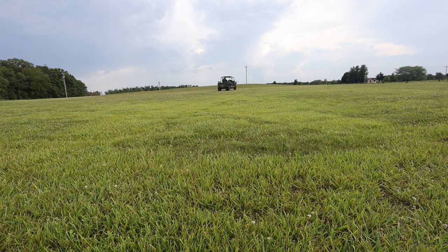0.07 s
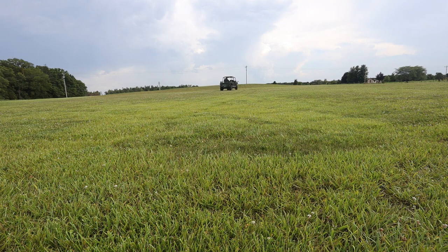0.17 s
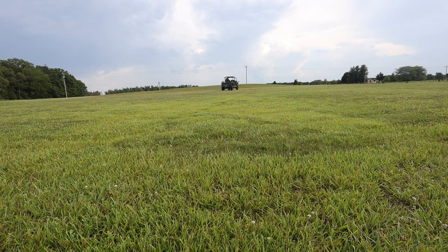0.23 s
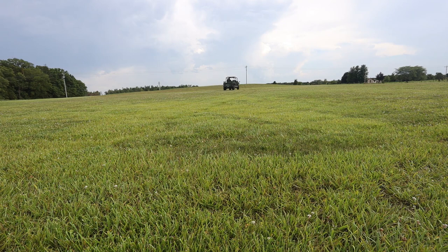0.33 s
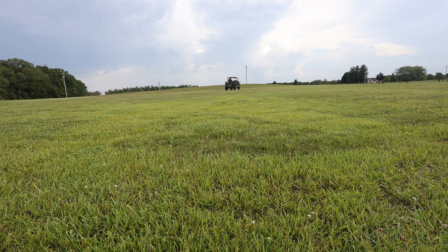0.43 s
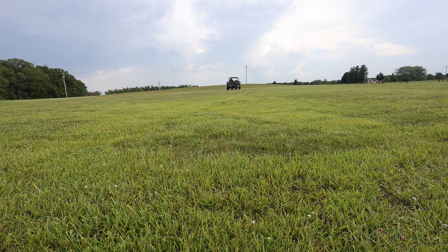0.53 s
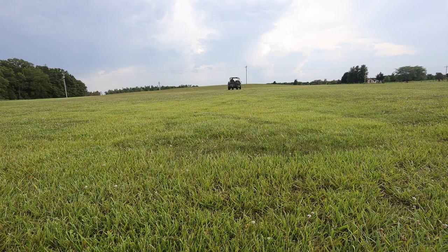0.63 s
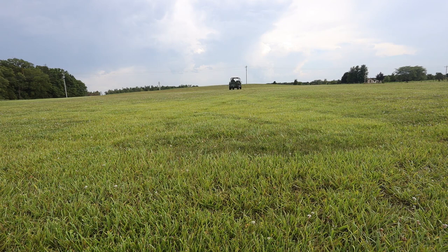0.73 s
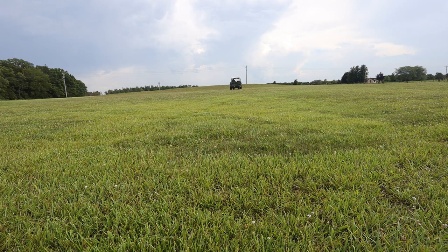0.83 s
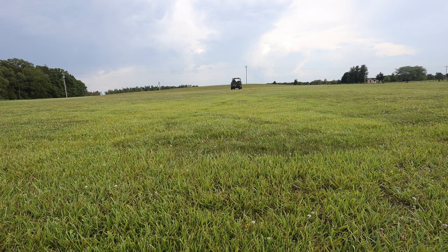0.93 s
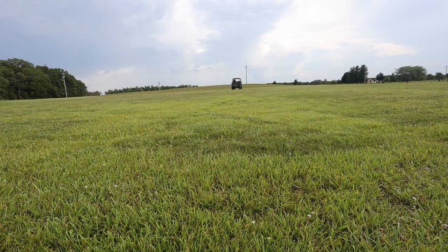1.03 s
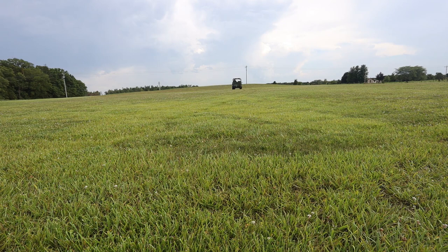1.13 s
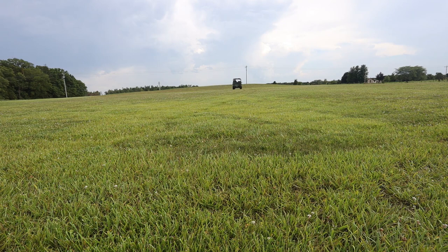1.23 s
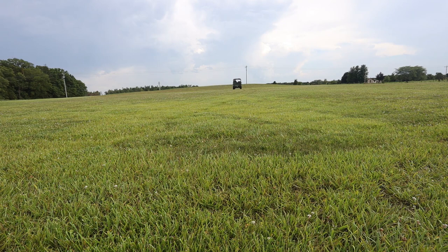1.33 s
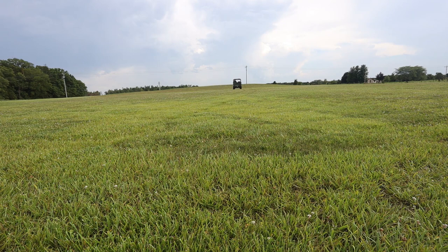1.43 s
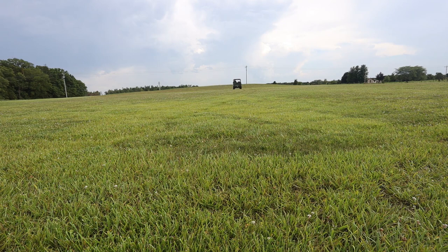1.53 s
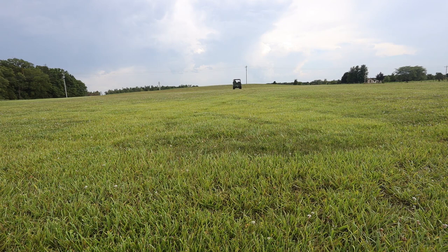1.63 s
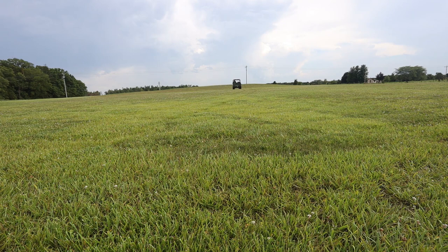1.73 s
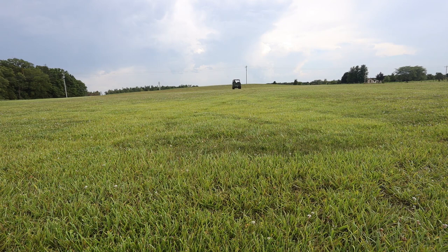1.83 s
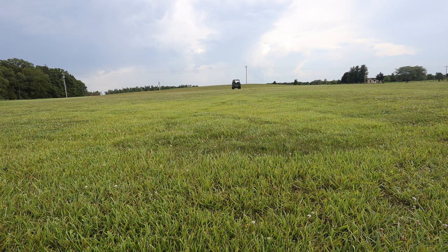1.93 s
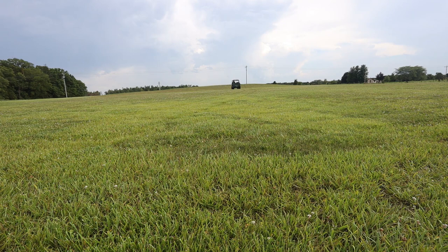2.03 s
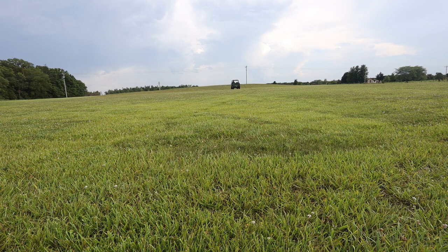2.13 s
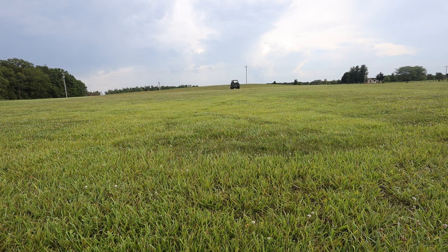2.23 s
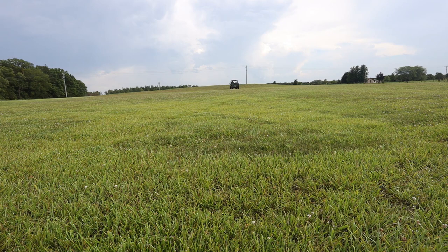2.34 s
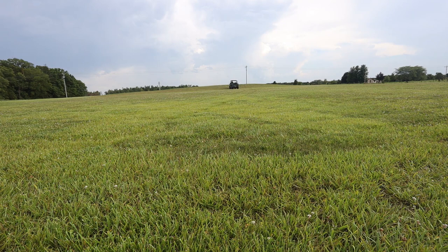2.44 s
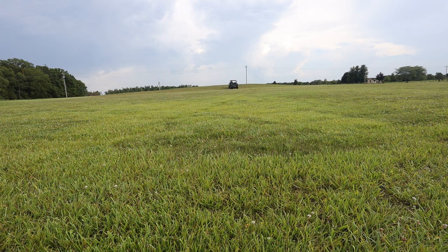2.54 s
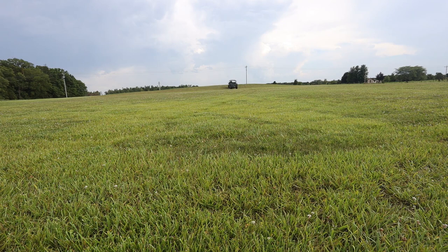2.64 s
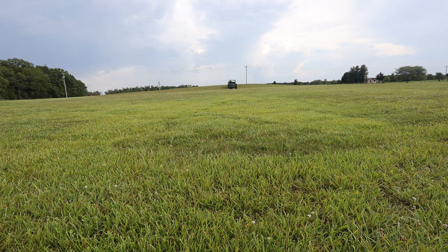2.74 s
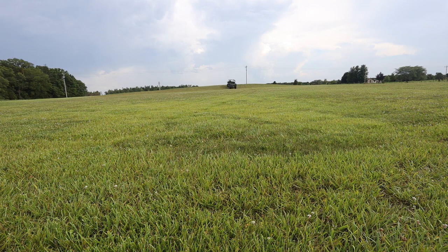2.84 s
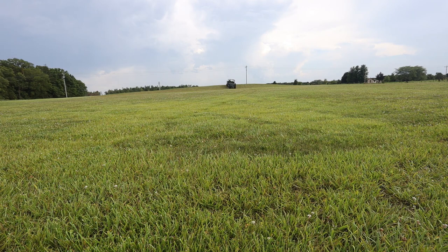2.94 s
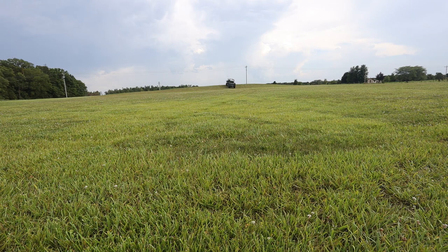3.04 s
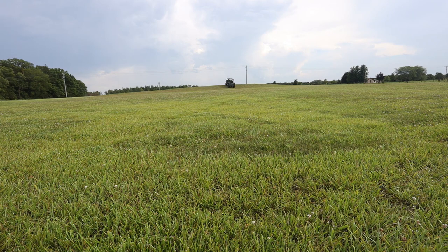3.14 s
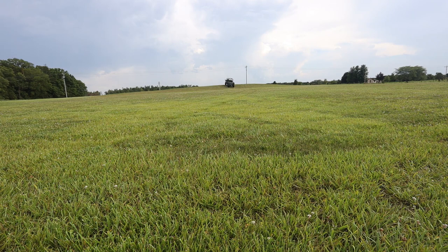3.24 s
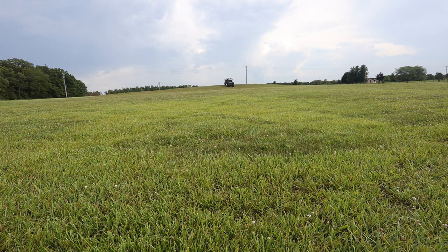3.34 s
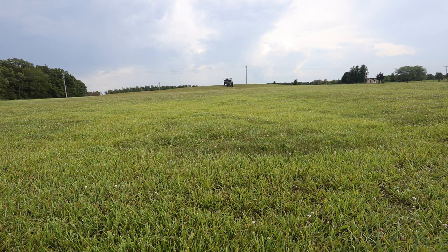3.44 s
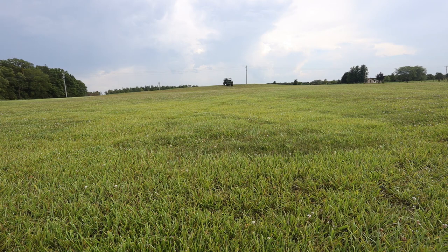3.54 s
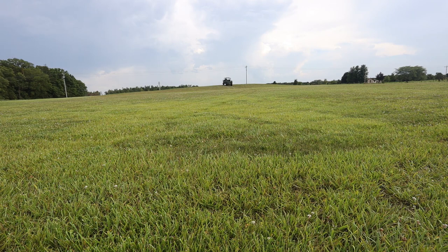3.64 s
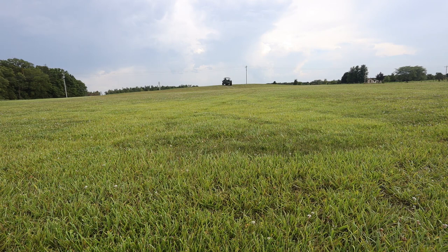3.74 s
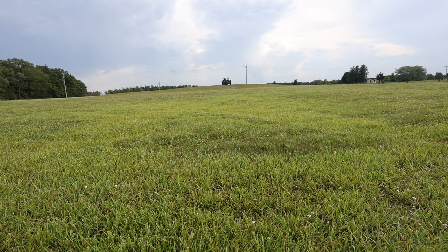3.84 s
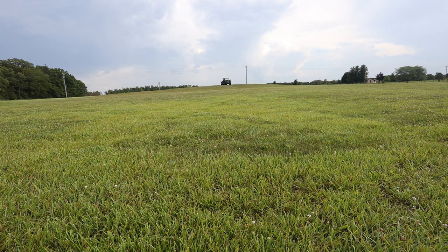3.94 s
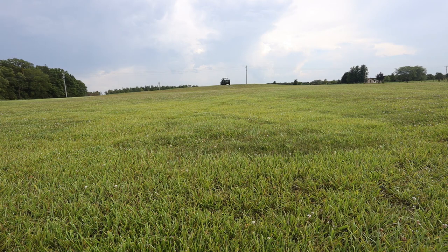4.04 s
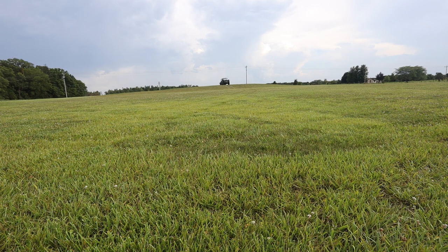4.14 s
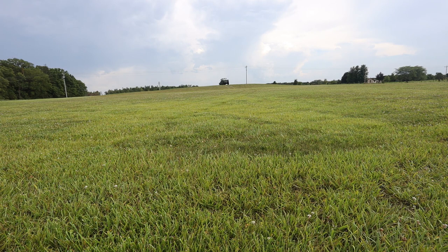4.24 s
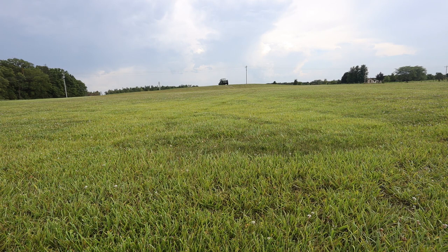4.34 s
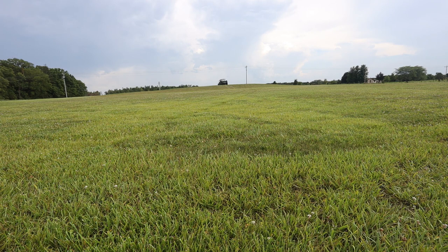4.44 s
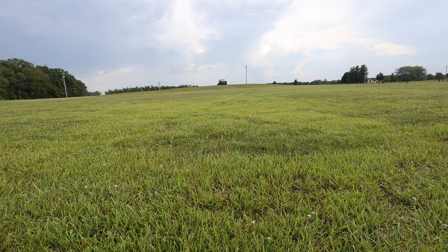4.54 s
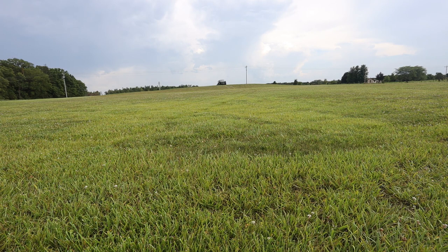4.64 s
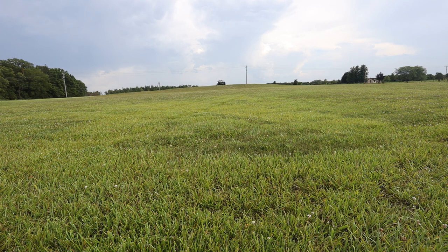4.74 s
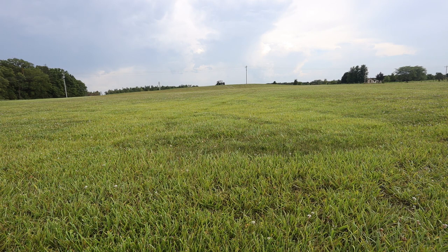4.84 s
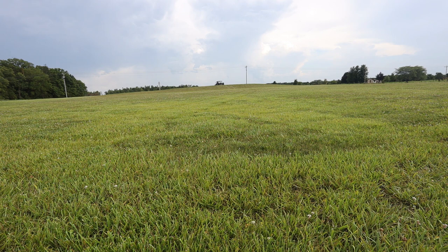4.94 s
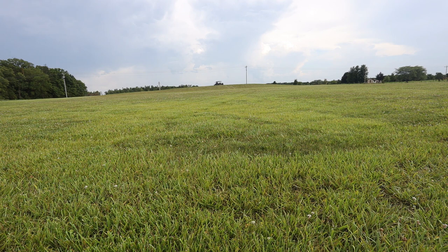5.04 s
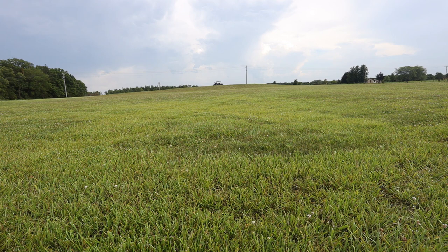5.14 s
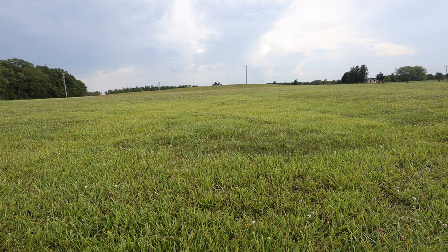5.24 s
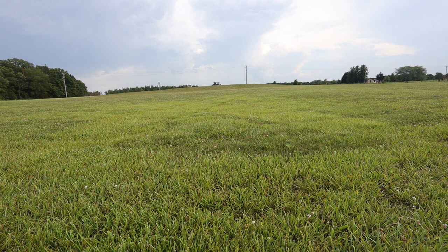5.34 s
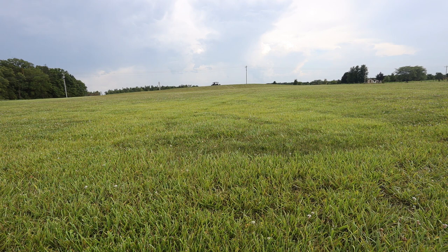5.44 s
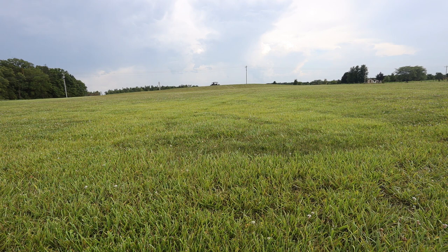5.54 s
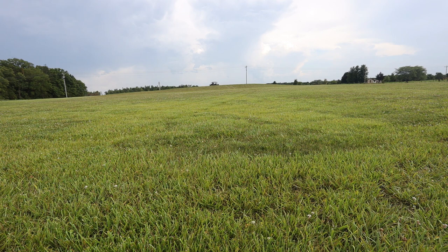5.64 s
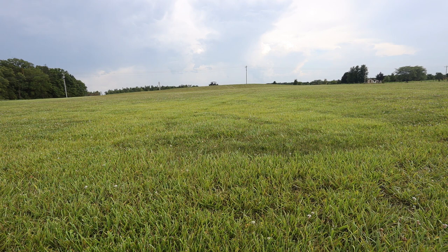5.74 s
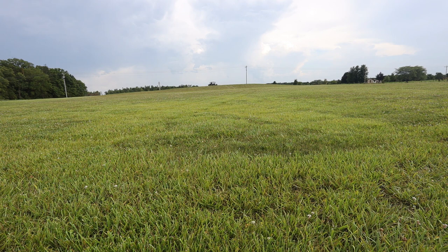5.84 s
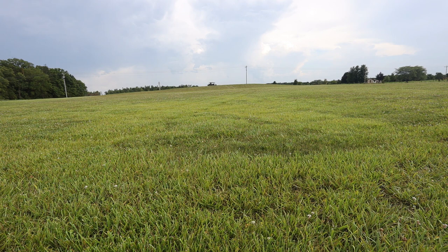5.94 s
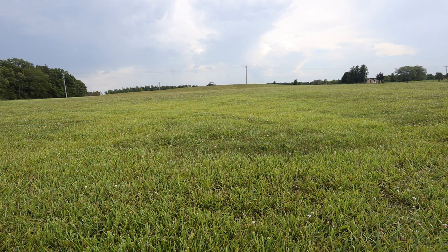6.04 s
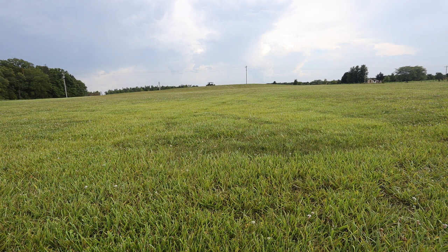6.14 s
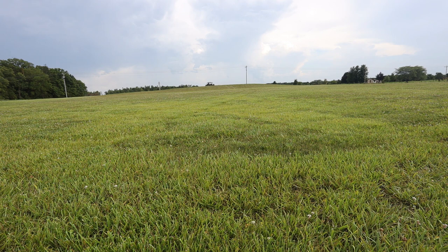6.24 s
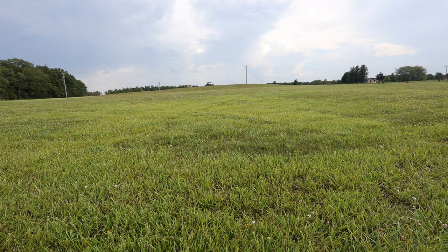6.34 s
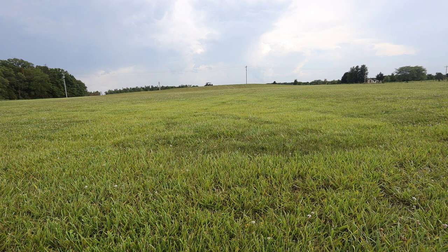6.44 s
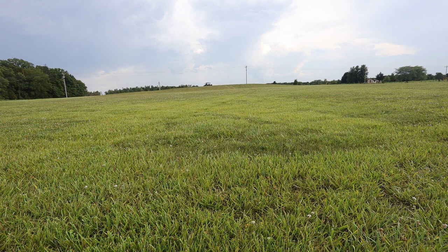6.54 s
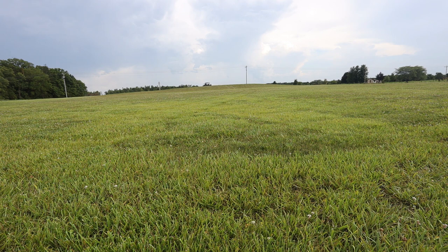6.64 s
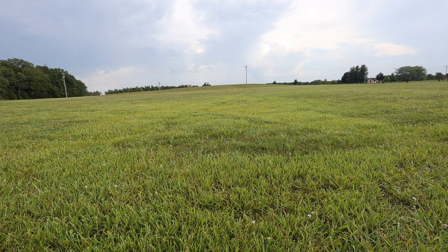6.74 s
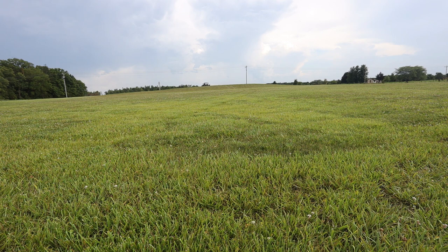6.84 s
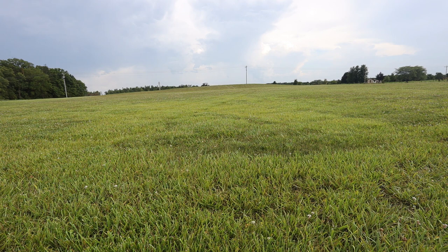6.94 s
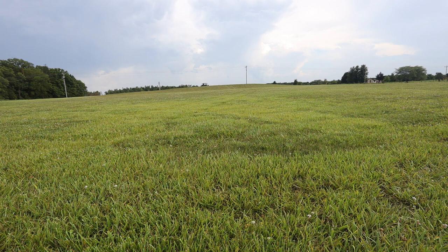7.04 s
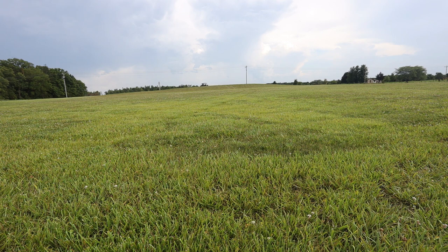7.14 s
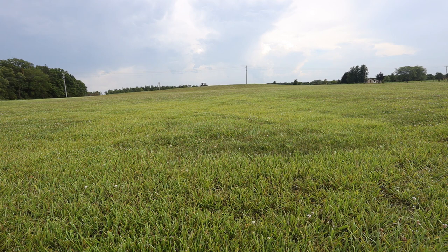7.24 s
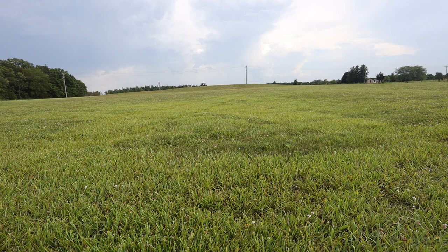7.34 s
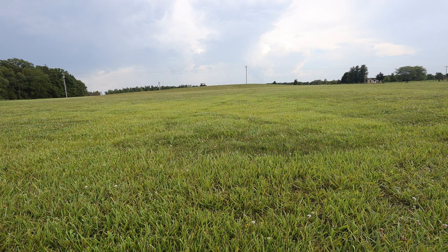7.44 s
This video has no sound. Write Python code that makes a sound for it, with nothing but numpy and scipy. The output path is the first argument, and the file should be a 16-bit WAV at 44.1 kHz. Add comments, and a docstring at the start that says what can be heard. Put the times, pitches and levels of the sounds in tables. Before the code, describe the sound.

Distant rough engine with low exhaust tones and bright clatter slows to a lumpy mutter, then revs higher, rattling over bumps as it recedes.

```python
"""Clean low exhaust tones over a rough roar: a heavy four-cylinder off-road vehicle, far across a grass field.
It slows, revs up and drops behind a rise. The tones are sine waves tied to the engine's firings.
The roar and the clatter of the engine block are noise that pulses with the firings.
Loose bodywork clanks over bumps as bursts of ringing noise, a spring squeaks and the chassis thumps once.
A thin intake whistle falls in pitch at the start, a few soft hums come and go, and the microphone hisses."""
import sys
import numpy as np
from scipy import signal
from scipy.fft import rfft, irfft
from scipy.io import wavfile
from scipy.ndimage import uniform_filter1d

SR = 44100
rng = np.random.default_rng(int(sys.argv[2]) if len(sys.argv) > 2 else 0)


def persist_wave(psi):
    """Save psi, clipped to +-1, as 16-bit WAV."""
    counts = np.round(np.clip(psi, -1, 1) * 32767).astype(np.int16)
    wavfile.write(sys.argv[1], SR, np.atleast_2d(counts).T)


def gain_from_db(level_db):
    """Turn a decibel level (scalar or array-like) into a linear amplitude factor."""
    decades = np.asarray(level_db, float) / 20
    return 10 ** decades


N = 329868
TIME = np.arange(N) / SR  # seconds

# colour of the microphone hiss: pitch_hz, density_db (per Hz)
HISS_COLOUR = [(500, 11.5), (4000, -0.5), (9000, -4.5), (12000, -6.5), (16000, -6.5)]
# thin high whistle from the intake: time_s, pitch_hz, level_db
WHISTLE = [(0, 12700, -71), (.35, 12400, -71), (.55, 12150, -77), (.75, 12050, -71), (1, 11700, -72),
           (1.4, 11100, -77), (1.8, 10800, -92)]
# soft hums that glide in pitch: start_s, end_s, start_pitch_hz, end_pitch_hz, level_db
HUMS = [(0, 1, 236, 228, -36), (0, .4, 598, 594, -43), (.9, 1.7, 540, 524, -43), (.3, .8, 640, 632, -48),
        (3.1, 3.5, 400, 370, -48)]
# chassis landing: strength_db, low_mode_hz, upper_mode_hz, time_to_fade_60_db_s
THUMP = (-20, 172, 270.5, 0.12)
# short spring squeaks: start_s, length_s, pitch_hz, level_db (of the lowest tone)
SQUEAKS = [(5.42, .045, 1850, -44), (5.503, .015, 1950, -49), (6.19, .02, 1950, -50),
           (7.16, .07, 7300, -58)]
# bodywork clanks: start_s, peak_db (1 dB is added), centre_hz,
# treble_db (above 5 kHz, against the body; 4 dB is added), rattle_s (before it fades)
CLANKS = [(3.172, -36, 1560, -18.5, 0.011), (3.317, -31.5, 1340, -19, 0.0091),
          (3.417, -26.5, 2580, -34, 0.011), (3.44, -28.5, 1570, -33, 0.014),
          (4.1926, -32.5, 1270, -20, 0.013), (4.321, -34, 1520, -24, 0.0082),
          (4.4712, -24, 1672, -31, 0.0084), (4.5039, -35, 1280, -27, 0.011),
          (4.6186, -18.5, 3353, -30, 0.012), (4.6382, -26, 1500, -23, 0.013),
          (4.8737, -36, 1265, -16, 0.012), (4.8884, -27.5, 1319, -30, 0.0098),
          (4.8954, -31, 1310, -33, 0.01), (4.9703, -34, 2960, -22, 0.009),
          (5.3166, -33.5, 3100, -19, 0.012), (5.7356, -35.5, 1335, -26, 0.0095),
          (6.1393, -37, 1240, -23, 0.011), (6.1667, -33, 2590, -25, 0.012),
          (6.5744, -34.5, 1720, -14, 0.0097), (6.6608, -29.5, 2975, -24, 0.012),
          (6.6812, -25, 1411, -22, 0.018), (6.6978, -26.5, 2860, -22, 0.011),
          (6.732, -31, 1770, -21, 0.0089), (6.7785, -29.5, 2573, -23, 0.02),
          (6.8384, -32.5, 2876, -22, 0.0096), (6.909, -38, 3768, -20, 0.0085),
          (6.925, -37.5, 1830, -23, 0.008), (7.1761, -32.5, 3366, -25, 0.012),
          (7.1958, -24, 1740, -22.5, 0.016), (7.224, -30, 1640, -25, 0.011),
          (7.3104, -26.5, 2870, -15.5, 0.0074), (7.4525, -32, 1239, -22, 0.011)]
# resonances of the loose panel: pitch_hz, width_hz, strength_db
PANEL = [(1240, 60, 10), (1720, 420, 20.5), (2460, 360, 14), (2870, 30, 13), (3380, 60, 15), (4120, 40, 5)]
# level of the block clatter: time_s, level_db
CLATTER_LEVEL = [(0.0, -30.5), (0.98, -30), (1.79, -35.5), (2.02, -38), (2.46, -42.5), (2.88, -43),
                 (3.58, -39), (4.5, -40.5), (4.87, -44.5), (5.81, -45.5), (6.1, -43.5), (6.73, -45),
                 (6.88, -51), (7.25, -44), (7.48, -53.5)]
# colour of the clatter with the engine fast, then slow: pitch_hz, density_db (per Hz)
CLATTER_FAST = [(410, -34), (700, -12), (888, -16.5), (1170, -10), (1330, -10), (1450, -0.5), (1810, -2),
                (2020, -7.5), (3240, -9), (4370, -8.5), (4860, -21), (5220, -20), (5950, -23),
                (8010, -15.5), (12000, -37.5), (15600, -64), (22000, -120)]
CLATTER_SLOW = [(410, -41), (700, -23), (1240, -3.5), (1360, -5), (1480, -5), (1830, -2), (1990, -6.5),
                (2330, -3.5), (2710, 1), (4210, -5.5), (4920, -15), (5350, -16), (5880, -27), (7920, -30),
                (12000, -38), (15600, -58), (22000, -120)]
# how the clatter follows engine speed: firings_hz (per second), throb_depth (0-1), slow_colour_share (0-1)
KNOCK = [(29.27, 0.98, 0.77), (38, 0.58, 0.4), (43, 0.71, .45), (50, 0.29, 0.4), (62, 0.55, 0.3)]
# ringing of the engine block: pitch_hz, width_hz, peak_db (gain at the centre, before it swells and fades)
BLOCK_RINGS = [(1436, 30, 4), (1864, 28, 0.5), (3500, 10, 3), (5180, 100, 6.5), (7360, 39, 4)]
# treble notch where the direct path and the ground path cancel: centre_hz, width_hz, depth (0-1)
GROUND_NOTCH = (4880, 300, .85)
# level of the exhaust roar (2.5 dB is taken off for the noise): time_s, level_db
ROAR_LEVEL = [(0, -30), (.5, -30.5), (1, -29), (1.5, -31), (2, -32.5), (2.45, -35), (2.85, -39), (3.2, -39),
              (3.6, -39), (4.1, -37), (4.7, -36.5), (5.2, -38), (5.6, -36), (6, -37), (6.4, -34),
              (6.7, -34), (7, -40), (7.48, -40)]
# colour of the roar in the open, then behind the rise: pitch_hz, density_db (per Hz)
ROAR_OPEN = [(15, -50), (40, -43), (70, -31), (110, -14.5), (170, -18), (250, -23.5), (350, -25),
             (450, -28), (560, -29.5), (660, -32.5), (760, -43.5), (900, -59), (1200, -72), (2000, -120)]
ROAR_HIDDEN = [(15, -51), (40, -32), (70, -16), (110, -13.5), (170, -8.5), (230, -12.5), (300, -20.5),
               (400, -22.5), (470, -30.5), (540, -41.5), (700, -52.5), (900, -50), (1200, -43),
               (2000, -120)]
# how far the rise hides the vehicle: time_s, hidden_share (0-1)
HIDDEN = [(0, 0), (.7, 0.15), (2.2, 0.21), (2.7, 0.46), (3.8, 0.55), (4.2, 0.96), (7.48, 0.89)]
# engine speed and low exhaust tones: time_s, firings_hz (per second), level_db (0.8 dB is taken off)
ENGINE = [(0.0, 50.44, -21), (0.04, 49.52, -17), (0.96, 47.85, -16), (1.1, 46.8, -18), (1.58, 46.37, -20),
          (1.89, 45.73, -19.5), (2.39, 43.82, -21), (2.56, 39.45, -24.5), (3.02, 37.8, -26),
          (3.46, 31.44, -30), (3.9, 28.74, -29), (4.04, 30.45, -22.5), (4.29, 39.3, -19.5),
          (4.48, 46.4, -20.5), (4.62, 51.73, -22.5), (4.69, 53.25, -21.5), (5.25, 61.07, -23.5),
          (5.54, 62.2, -25), (5.77, 57.43, -26.5), (6.23, 62.2, -26.5), (6.46, 56.17, -24.5),
          (6.6, 57.3, -23), (6.73, 57.22, -29.5), (6.88, 53.45, -25.5), (7.23, 50.04, -30.5),
          (7.48, 52.8, -32.5)]
# response of pipe and ground to the four main tones, in the open, then behind the rise: pitch_hz, gain_db
PIPE_OPEN = [(28, -12), (40, -18.5), (49, -14.5), (60, 1), (76, -4.5), (95, -5.5), (115, -1), (130, 1.5),
             (146, 0), (160, -4), (182, -10), (196, -23.5), (250, -20)]
PIPE_HIDDEN = [(28, -22), (42, -17), (52, -14), (61, -5.5), (80, 2.5), (100, -5.5), (113, -3), (122, -9),
               (140, -6.5), (165, 1.5), (186, -3), (210, -17.5), (245, -6)]
# time with the throttle closed: start_s, end_s
COAST = (2.45, 4.0)
# change of the four main tones with the throttle closed, before they share the level: one gain_db each
COAST_DB = (0.5, 0.1, -4, -0.2)
# tones between the main ones, from unequal cylinders: quarter_steps, level_db (against the two neighbours)
UNEVEN = [(1, -23), (2, -24), (3, -17)]
# tones above the fourth main one, against the roar: main_tones_db, quarter_steps_db
UPPER_DB = (-5.5, -14)


def evened(x):
    """Scales a sound to an average strength (rms) of 1."""
    return x / np.sqrt(np.mean(x ** 2) + 1e-20)


def columns(rows, at=TIME):
    """Reads every later column of a table, with straight lines between the values of its first column."""
    first, *rest = np.transpose(rows)
    return [np.interp(at, first, column) for column in rest]


def read(points, hz):
    """Reads a spectrum at the frequencies hz, with straight lines on a log scale."""
    f, value = np.transpose(points)
    return np.interp(np.log(hz + 1), np.log(f + 1), value)


def resonate(x, hz, width):
    """A resonance of gain 1: shifts the pitch hz down to zero, smooths, and shifts back."""
    turn = np.exp(2j * np.pi * np.cumsum(hz * np.ones(len(x))) / SR)
    r = np.exp(-np.pi * abs(width) / SR)
    return 2 * (turn * signal.lfilter([1 - r], [1, -r], x / turn)).real


def drift(seconds):
    """Slow random wandering of rms 1: noise smoothed twice."""
    size = max(round(seconds * SR), 1)
    return evened(uniform_filter1d(uniform_filter1d(rng.standard_normal(N), size), size))


def slow(size, count):
    """Slow random wandering made of count random points joined by lines."""
    return np.interp(np.linspace(0, count - 1, size), np.arange(count), rng.standard_normal(count))


def noise(first_db, second_db, share, band_hz, size, patchy_db):
    """Patchy noise whose colour blends two spectra; its power inside band_hz is evened in every frame."""
    frames = 4 * N // size + 5
    hz = np.fft.rfftfreq(size, 1 / SR)
    share = np.clip(np.interp(np.arange(frames) * size / 4 / SR, TIME, share), 0, 1)
    colour = gain_from_db(np.outer(read(first_db, hz), 1 - share) + np.outer(read(second_db, hz), share))
    colour /= np.linalg.norm(colour[(hz > band_hz[0]) & (hz < band_hz[1])], axis=0)
    a, b, patches = rng.standard_normal((frames, len(hz), 3)).T
    patches = evened(uniform_filter1d(uniform_filter1d(patches, size=8, axis=0), size=8, axis=1))
    spectrum = (a + 1j * b) * colour * gain_from_db(patchy_db * patches)
    sound = signal.istft(spectrum, nperseg=size, noverlap=3 * size // 4)[1][:N]
    return sound * np.sqrt(.75 / 4) * 2  # makes up for the overlap of the frames


def throb(turns, depth, decay, spread_db):
    """One puff per firing, sudden then fading, each of its own strength; mean power is about 1."""
    strength = gain_from_db(spread_db * rng.standard_normal(1000))[turns.astype(int)]
    puff = evened(uniform_filter1d(strength * np.exp(-(turns % 1) / decay), size=160))
    depth = np.clip(depth, 0, 1)
    return np.sqrt(1 - depth + depth * puff ** 2)


def microphone_hiss():
    """Steady microphone hiss: coloured noise above 300 Hz."""
    hz = np.fft.rfftfreq(N, 1 / SR)
    hiss = irfft(rfft(rng.standard_normal(N)) * gain_from_db(read(HISS_COLOUR, hz)) * (hz > 300), N)
    return gain_from_db(-53.5) * evened(hiss)


def whistle():
    """Intake whistle: noise through two narrow resonances that fall in pitch."""
    hz, db = columns(WHISTLE)
    tone = resonate(resonate(rng.standard_normal(N), hz, 130), hz, 130)
    return gain_from_db(db) * evened(tone) * (TIME < WHISTLE[-1][0])


def hums():
    """Soft-edged gliding sines with a slightly unsteady phase."""
    out = np.zeros(N)
    for start, end, start_hz, end_hz, db in HUMS:
        hz = np.interp(TIME, (start, end), (start_hz, end_hz))
        phase = 2 * np.pi * np.cumsum(hz) / SR + .2 * drift(.08)
        # each hum fades in a little ahead of its start
        swell = np.clip(np.minimum(TIME - start + 0.287, end - TIME) / 0.05, 0, 1)
        out += gain_from_db(db) * swell * np.sqrt(2) * np.sin(phase)
    return out


def thump():
    """The chassis lands: two low modes struck once, the upper one twice as strong."""
    db, low_hz, upper_hz, fade_s = THUMP
    t = np.maximum(TIME - 7.198, 0)  # seconds since the landing
    modes = np.sin(2 * np.pi * low_hz * t) + 2.0 * np.sin(2 * np.pi * upper_hz * t)
    return gain_from_db(db - 60 * t / fade_s) * np.minimum(t / 0.0066, 1) * modes


def squeaks():
    """Stick-slip in a spring: three slightly rough harmonics, or one tone alone when the pitch is high."""
    out = np.zeros(N)
    for start, length, hz, db in SQUEAKS:
        t = TIME - start
        phase = 2 * np.pi * hz * t * (1 - .15 * t) + .25 * drift(.003)  # the pitch sags a little
        swell = np.cos(np.pi * np.clip(t / length - .5, -.5, .5))
        harmonics = range(3 if hz < SR / 8 else 1)
        tones = sum(gain_from_db(-4.5 * k ** 2 + 4 * k) * np.sin((k + 1) * phase) for k in harmonics)
        out += gain_from_db(db) * swell * tones
    return out


def clanks():
    """Each bump shakes a loose panel: a brief rattle of noise that rings its resonances."""
    out = np.zeros(N)
    t = TIME[:SR // 4]
    middle = signal.butter(7, (1000, 4600), "band", fs=SR, output="sos")
    high = signal.butter(4, (5000, 9500), "band", fs=SR, output="sos")
    shakes = rng.standard_normal((len(CLANKS), len(t)))
    for (start, db, centre_hz, treble_db, rattle_s), shake in zip(CLANKS, shakes):
        ticks = np.repeat(shake[::90], 90)[:len(t)]
        shake = shake * gain_from_db(2.0 * np.roll(ticks, shift=len(t) // 2))  # a bunch of uneven ticks
        shake = shake * (1 + .9 * np.exp(-t / .003))  # the first contact snaps
        fade_s = max(0.12 - 0.0051 * (db + 34), .02)  # time to fade 60 dB: louder clanks die sooner
        shake = shake * np.minimum(t / 0.00077, 1) * gain_from_db(-60 * np.maximum(t - rattle_s, 0) / fade_s)
        ring = np.zeros(len(t))
        for hz, width, strength_db in PANEL:
            # modes are weaker by 25 dB per octave away from the centre of the clank
            mode_db = strength_db - 25 * abs(np.log2(hz / centre_hz))
            ring += gain_from_db(mode_db) * resonate(shake, hz, width) / np.sqrt(width)
        centre = resonate(resonate(shake, centre_hz, 2200), centre_hz, 2600)
        body = signal.sosfilt(middle, .8 * evened(ring) + evened(centre))
        sound = evened(body) + gain_from_db(treble_db + 4.0) * evened(signal.sosfilt(high, shake))
        part = out[round(start * SR):][:len(t)]
        part += (gain_from_db(db + 1.0) * sound / abs(sound).max())[:len(part)]
    return out


def clatter(rate_hz, turns):
    """Combustion knock and valve gear: bright noise pulsing with the firings, ringing the block."""
    depth, slow_share = columns(KNOCK, rate_hz)
    air = noise(CLATTER_FAST, CLATTER_SLOW, slow_share, (1000, 4500), size=512, patchy_db=1.0)
    knock = air * throb(turns + 0.25, depth, decay=0.73, spread_db=0.97)
    for hz, width, db in BLOCK_RINGS:  # each ring swells and fades by itself
        swell = gain_from_db(1.54 * slow(N, count=30))
        knock = knock + (gain_from_db(db) - 1) * swell * resonate(knock, hz, width)
    return gain_from_db(columns(CLATTER_LEVEL)[0] + 0.26 * drift(0.025)) * knock


def roar(turns, hidden):
    """Turbulent exhaust and tyre rumble: low noise swelling a little with each firing."""
    air = noise(ROAR_OPEN, ROAR_HIDDEN, hidden, (260, 700), size=2048, patchy_db=2.0)
    return gain_from_db(columns(ROAR_LEVEL)[0] - 2.5) * air * throb(turns, 0.14, decay=0.99, spread_db=3.5)


def main_tones_db(rate_hz, level_db, hidden):
    """The pipe shares the exhaust level among tones 1 to 4; a closed throttle shifts the balance."""
    t = np.linspace(0, N / SR, len(hidden))
    coast = np.clip(np.minimum(t - COAST[0], COAST[1] - t) / .1, 0, 1)  # edges of 0.1 s
    pipe = []
    for k in (1, 2, 3, 4):
        hz = k * rate_hz
        gain_db = (1 - hidden) * read(PIPE_OPEN, hz) + hidden * read(PIPE_HIDDEN, hz)
        waver_db = 1.0 * slow(len(hidden), count=50)
        pipe.append(gain_db + coast * COAST_DB[k - 1] + waver_db)
    pipe = np.array(pipe)
    return level_db + pipe - 10 * np.log10((gain_from_db(pipe) ** 2).sum(0))


def exhaust_tones(rate_hz, turns, level_db, hidden):
    """Sines on multiples of the firing rate, and weaker ones on quarter steps of the four-cylinder cycle."""
    step = 64  # levels are worked out once every 64 samples
    roar_db = columns(ROAR_LEVEL, TIME[::step])[0]
    rate_hz, hidden = rate_hz[::step], hidden[::step]
    mains_db = main_tones_db(rate_hz, level_db[::step] - .8, hidden)
    levels_db = [mains_db[0] - 28, *mains_db]
    uneven_turns = turns + .005 * drift(.04)  # firings never land quite evenly
    out = np.zeros(N)
    for quarter in range(1, 4 * 14):  # stops just short of 14 times the firing rate
        k, part = divmod(quarter, 4)
        order = quarter / 4
        if order > 4:  # upper tones take the colour of the roar
            hz = order * rate_hz
            open_db, hidden_db = read(ROAR_OPEN, hz) + 19, read(ROAR_HIDDEN, hz) + 16
            colour_db = (1 - hidden) * open_db + hidden * hidden_db
            db = roar_db + np.minimum(colour_db, 3.) + UPPER_DB[part > 0]
        elif part:  # a blend of the two neighbours, made weaker
            db = (levels_db[k] * (4 - part) + levels_db[k + 1] * part) / 4 + UNEVEN[part - 1][1]
        else:
            db = levels_db[k]
        lag = np.pi / 2 - .25 * (order - 2.5) ** 2
        if part or order > 4:  # these waver in level; the quarter steps also start at random phases
            db = db + 2.0 * slow(len(db), count=42)
            lag = lag + 2 * np.pi * rng.random() * (part > 0)
        out += np.repeat(gain_from_db(db), step)[:N] * np.cos(2 * np.pi * order * uneven_turns + lag)
    return np.sqrt(2) * out


def scene():
    """Adds the parts of the vehicle; clatter, clanks and squeaks pass through the ground notch."""
    rate_hz, level_db = columns(ENGINE)
    turns = np.cumsum(rate_hz) / SR  # firings so far
    hidden = np.clip(columns(HIDDEN)[0], 0, 1)
    bright = clatter(rate_hz, turns) + clanks() + squeaks()
    notch_hz, width, depth = GROUND_NOTCH
    bright = bright - np.clip(depth, 0, 1) * resonate(bright, notch_hz, width)
    low = exhaust_tones(rate_hz, turns, level_db, hidden) + hums() + roar(turns, hidden) + thump()
    return (low + bright + whistle())[None]


def low_pass(x):
    """Removes everything above the highest recorded frequency."""
    return signal.sosfilt(signal.butter(12, 16990, fs=SR, output="sos"), x)


def record(dry):
    """The microphone adds its hiss, and everything from 15780 Hz up is cut off."""
    hz = np.fft.rfftfreq(N, 1 / SR)
    heard = irfft(rfft(dry + microphone_hiss()) * (hz < 15780), N)
    return low_pass(heard)


dry = scene()
out = record(dry)
persist_wave(out)
```